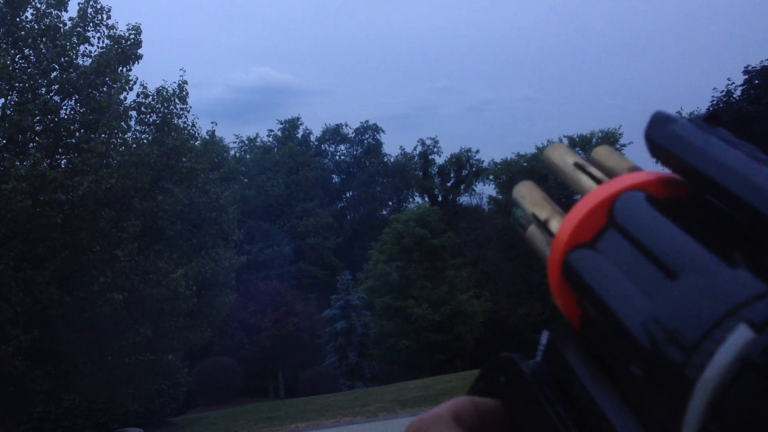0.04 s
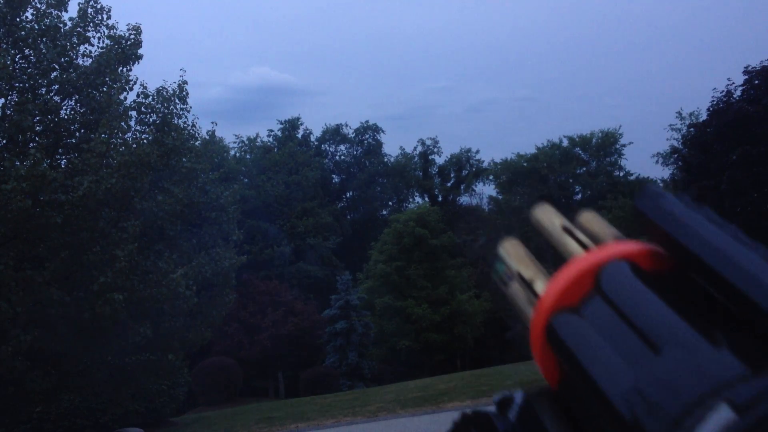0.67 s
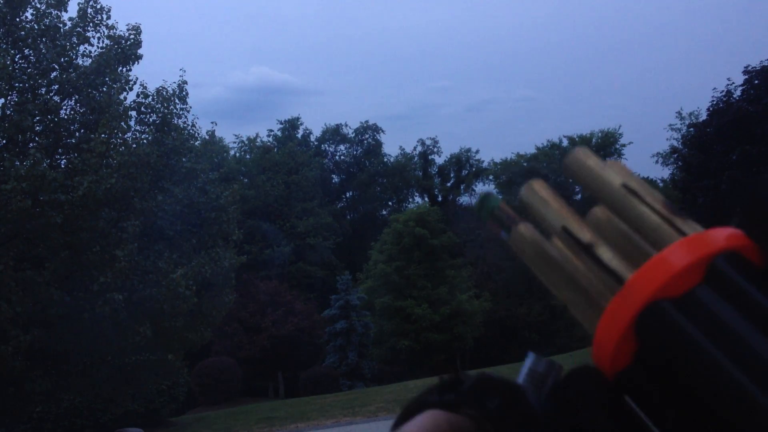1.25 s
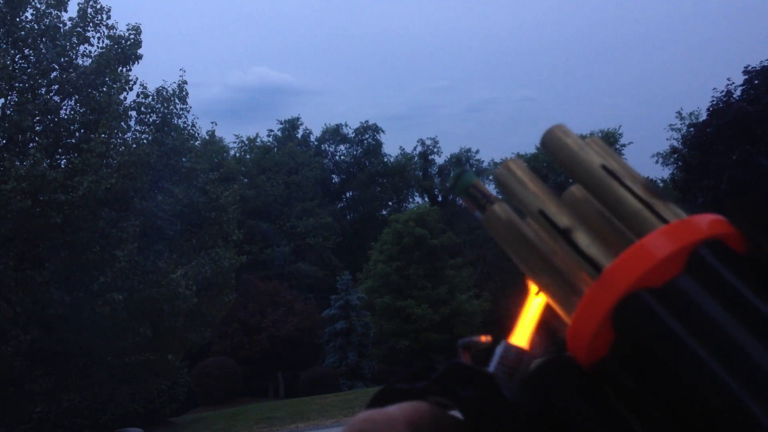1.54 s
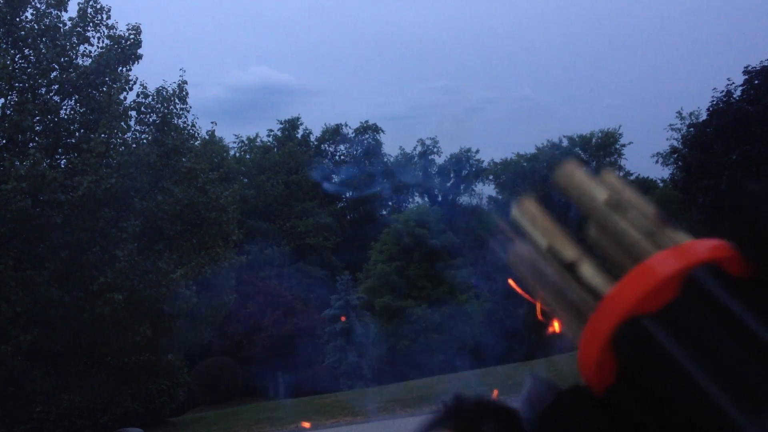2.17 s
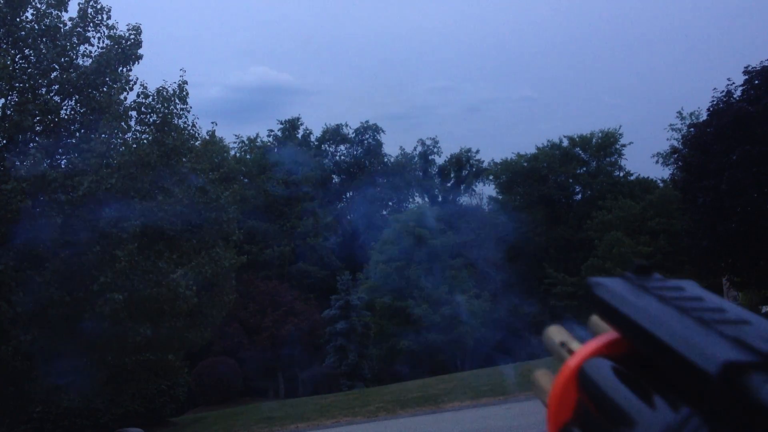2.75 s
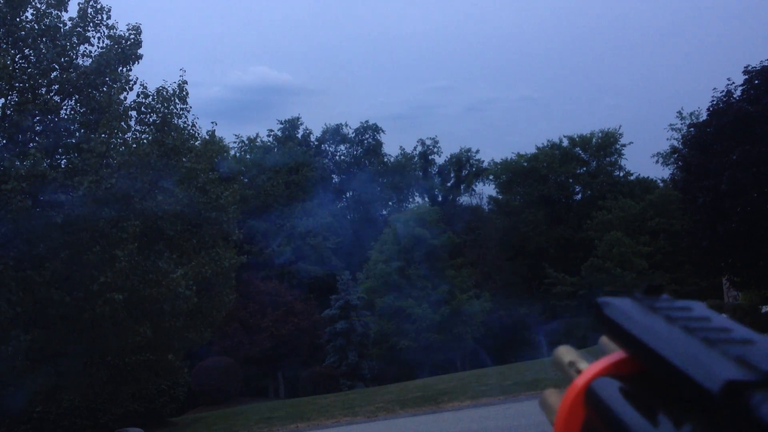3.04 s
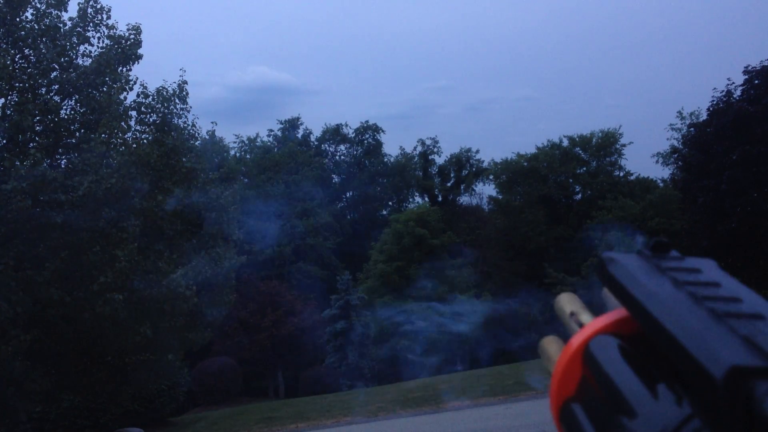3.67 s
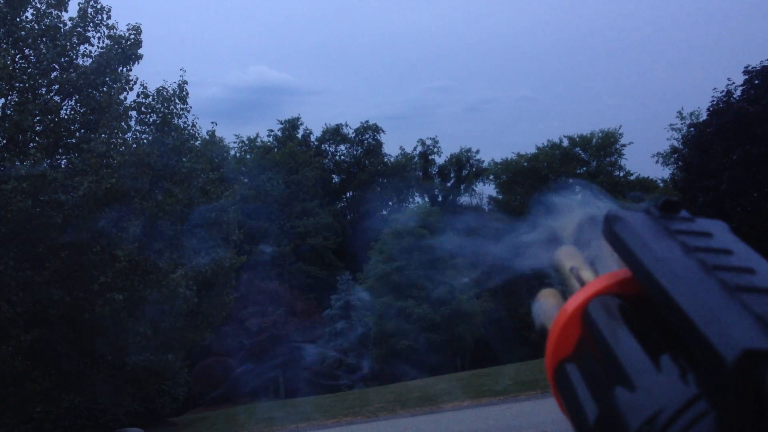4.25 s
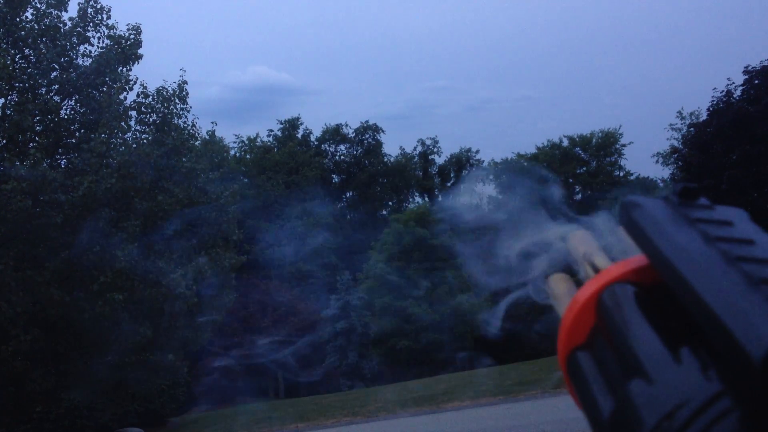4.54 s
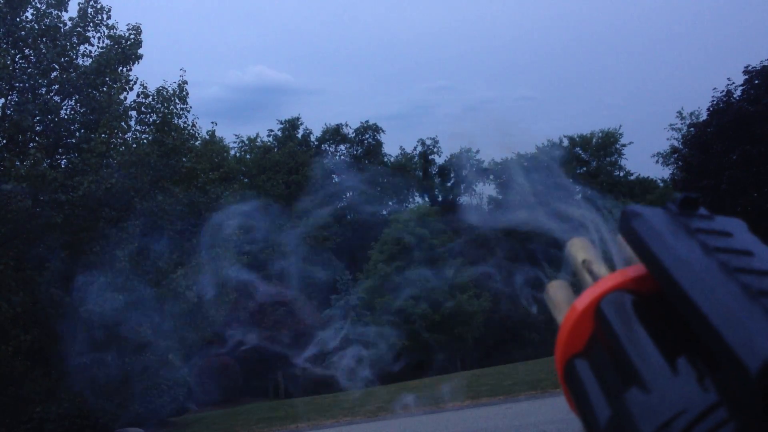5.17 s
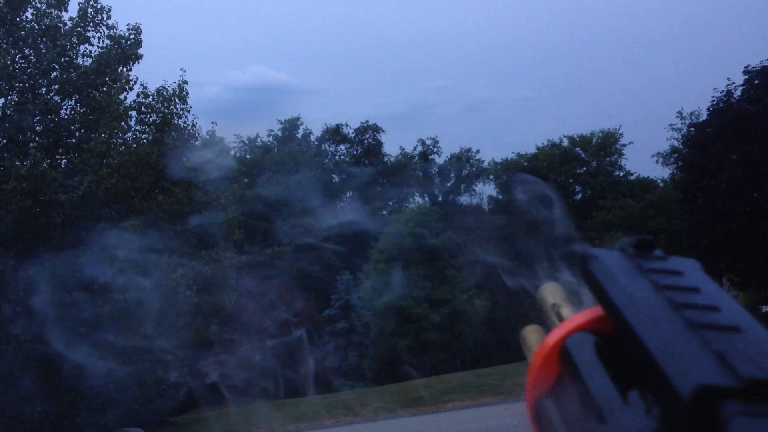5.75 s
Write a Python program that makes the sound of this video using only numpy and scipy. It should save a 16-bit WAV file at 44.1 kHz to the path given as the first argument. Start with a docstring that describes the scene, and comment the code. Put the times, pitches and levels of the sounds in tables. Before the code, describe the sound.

Sharp lighter clicks and a quiet fuse hiss outdoors, followed by a rocket rushing out of a pipe with a piercing whistle.

```python
"""Lighting a whistling bottle rocket

In a quiet yard a torch lighter clicks and hisses twice, and lights a rocket's fuse in a pipe barrel.
The launcher ticks as it is handled, the fuse fizzes into the pipe, and an engine speeds up far away.
The motor catches with a rush, and its burn starts to vibrate in a shrill whistle.
Out of the barrel the whistle turns rough, and falls in pitch as the rocket speeds away."""
import sys
import numpy as np
from scipy import signal
from scipy.fft import rfft, irfft
from scipy.io import wavfile
from scipy.ndimage import uniform_filter1d

SR = 44100
rng = np.random.default_rng(int(sys.argv[2]) if len(sys.argv) > 2 else 0)


def int16_out(signal):
    """Quantize to a 16-bit WAV file."""
    q = np.round(np.clip(np.atleast_2d(signal).T, -1, 1) * 32767)
    wavfile.write(sys.argv[1], SR, q.astype(np.int16))


N = 264906
T, HZ = np.arange(N) / SR, np.fft.rfftfreq(N, 1 / SR)

# tone colour of the evening air (frequency [Hz], level [dB])
AIR_COLOUR = [(18, -67), (30, -39), (79, -42), (108, -6.5), (350, -7.5), (532, -8), (575, -14.5),
              (1260, -16.5), (2070, -21.5), (4310, -21), (5040, -31), (6720, -27), (8500, -27),
              (11300, -28), (15500, -37)]
# faint hum and whine of a camera (pitch [Hz], level [dB])
HUM_TONES = [(1293, -73), (11120, -77.5)]
# how the plastic housing rings (pitch [Hz], width [Hz], level [dB])
HOUSING_RINGS = [(806, 100, -17), (1013, 55, 10.5), (1180, 69, 0), (1515, 220, 7.5), (2100, 65, 11.5),
                 (2860, 34, 6.5), (3450, 170, 0), (4430, 100, 3.5)]
# the lighter's trigger, pressed and let go twice
# (time [s], level [dB], body [dB], bite [dB], treble [dB], ring pitch [Hz])
TRIGGER_SNAPS = [(0.703, -10, -4.5, 2.5, 0, 3530), (1.0916, -15.5, -2, -4.5, 0.5, 8000),
                 (1.593, -11.5, -8, -1, -1.5, 1860), (2.2046, -24.5, -2, 2.5, -2, 2110)]
# small catches of the launcher, the last two perhaps sparks (time [s], level [dB], ring pitch [Hz])
LAUNCHER_TICKS = [(0.2918, -35, 10800), (0.986, -44, 4300), (1.025, -41.5, 7170), (1.2283, -28.5, 11800),
                  (1.4232, -25.5, 11700), (1.4425, -37, 7840), (1.5495, -26, 10600), (2.1377, -39.5, 3600),
                  (2.201, -35, 8200), (2.3684, -29.5, 11400), (2.3799, -35, 6700), (2.4541, -32.5, 11900),
                  (2.5176, -38.5, 7360), (2.548, -33.5, 12500), (2.5518, -38.5, 6840), (4.867, -51, 7600),
                  (5.278, -51, 8000)]
# smaller catches tick higher and thinner; rows are body, bite and treble
# (level at the middle pitch [dB], slope [dB per octave])
TICK_COLOUR = [(-8, -6), (0.5, -6), (0, 9.5)]
# dull knocks of the grip (time [s], level [dB])
GRIP_KNOCKS = [(1.053, -46), (1.2524, -44), (1.535, -46), (1.548, -38), (2.1657, -42.5), (4.8758, -53)]
# the lighter's gas jet (start [s], end [s], level [dB], centre [Hz], width [Hz])
GAS_JETS = [(.44, 1.15, -57.5, 11000, 1160), (1.42, 1.605, -77, 12400, 1500),
            (1.6, 2.23, -57.5, 12500, 1920)]
# the fuse in the open, then deep in the pipe (frequency [Hz], level [dB])
FUSE_IN_OPEN = [(40, -60), (300, -8), (1500, -5.5), (2400, 8), (3200, -19), (4200, 4), (5600, -7.5),
                (7000, 0), (8100, 6.5), (9600, -3), (11500, -6), (13300, -8), (14800, -3.5)]
FUSE_IN_PIPE = [(40, -70), (300, -1.5), (1700, -16.5), (2300, -3), (2650, 6), (3300, -6.5), (4100, -4),
                (5500, -18), (7500, -16.5), (10000, -42), (12500, -13), (15000, -41)]
# the powder flares up (time [s], extra level [dB], half length [s])
FUSE_FLARES = [(1.98, 9.5, 0.08), (2.803, 4.5, .04), (3.237, 11, 0.053), (3.575, 8.5, 0.12), (4.3, 4, 0.32),
               (5.518, 4.5, 0.036)]
# the exhaust in the pipe, in flight, and as gusts on the microphone (frequency [Hz], level [dB])
RUSH_IN_PIPE = [(100, -19), (600, -10.5), (1700, -7.5), (2600, 2), (3500, 4), (4500, 6), (5600, -3.5),
                (8000, 0.5), (9300, -10.5), (12000, -12), (15000, -22)]
RUSH_IN_FLIGHT = [(100, -6), (600, 1), (1500, 1.5), (2200, 7), (3000, -1.5), (4500, 12), (5600, -6.5),
                  (8000, 0.5), (9300, -18), (12000, -4), (15000, -4)]
GUST_COLOUR = [(20, 9), (60, -5.5), (110, -11.5), (200, 2), (320, -1), (450, -11.5), (900, -13),
               (2500, -70)]
# uneven burning, strong before the whistle locks in and at the pipe's mouth (time [s], roughness [0-1])
BURN_ROUGHNESS = [(5.745, 1), (5.805, .7), (5.809, .06), (5.864, .1), (5.872, .68), (5.89, .45),
                  (5.896, .08), (5.912, .1), (5.92, .38)]
# the whistle inside the pipe (time [s], pitch [Hz])
PIPE_PITCH = [(5.745, 2715), (5.761, 3150), (5.783, 3479), (5.825, 4022), (5.833, 4010), (5.841, 3780),
              (5.861, 3650), (5.868, 3750)]
# the whistle's extra tones (pitch multiple [ratio], level in the pipe [dB], level in flight [dB])
EXTRA_TONES = [(.5, -58, -14.5), (1.5, -62, -14), (2, -5, -9.5), (2.5, -58, -14), (3, -15.5, -12),
               (3.5, -60, -21), (4, -19, -3)]
# the yard's echo (frequency [Hz], time to fade by 60 dB [s])
YARD_FADE = [(300, 0.3), (1500, 0.16), (4000, 0.22), (9000, 0.17), (15000, 0.16)]
# two dips in the treble that slightly hollow the whole sound (frequency [Hz], width [Hz], level [dB])
TREBLE_DIPS = [(5010, 160, -6), (9690, 1400, -7)]

# the motor lights, builds pressure, locks into its whistle, blasts the microphone and leaves the pipe
IGNITION_S, BUILD_S, LOCK_S, BLAST_S, EXIT_S = 5.684, 5.745, 5.808, 5.84, 5.870
SOUND_M_PER_S = 343


def amp(db):
    """Turns decibels into a gain."""
    return 10 ** (np.asarray(db) / 20)


def evened(x):
    """Scales a signal to an average power of 1."""
    return x / np.sqrt(np.mean(abs(x) ** 2) + 1e-20)


def read(points, hz=HZ):
    """Looks up a table's value at hz, on a log-frequency scale."""
    f, value = np.transpose(points)
    return np.interp(np.log(hz + 1), np.log(f + 1), value)


def curve(points):
    """Joins a time table's points with straight lines."""
    return np.interp(T, *np.transpose(points))


def ramp(start_s, length_s):
    """Rises evenly from 0 to 1."""
    return np.clip((T - start_s) / length_s, 0, 1)


def blend(a, b, share):
    """Goes from a to b as share goes from 0 to 1."""
    return a + share * (b - a)


def swell(top_s, half_length_s):
    """A smooth hump of height 1."""
    return np.exp(-((T - top_s) / half_length_s) ** 2)


def peak(hz, centre_hz, width_hz):
    """How strongly a ringing part answers each frequency; 1 at its centre."""
    return 1 / (1 + 2j * (hz - centre_hz) / width_hz)


def add(mix, s, sound):
    """Lays a sound into the mix at s seconds."""
    part = mix[round(s * SR):][:len(sound)]
    part += sound[:len(part)]


def noise(colour_db):
    """Noise of power 1, shaped by a level for each frequency."""
    return evened(irfft(rfft(rng.standard_normal(N)) * amp(colour_db), N))


def narrow_noise(centre_hz, width_hz):
    """Noise packed closely around one pitch."""
    return noise(20 * np.log10(abs(peak(HZ, centre_hz, 2 * width_hz)) ** 2))


def wander(rate_hz):
    """A random wobble of power 1, mostly slower than rate_hz."""
    return noise(-20 * np.log10(1 + (HZ / rate_hz) ** 2))


def evening_air(level_db=-57):
    """A soft background hush that wavers a little."""
    return amp(level_db + .5 * wander(3.9)) * noise(read(AIR_COLOUR))


def camera_hum():
    """Two faint, unsteady tones come from inside a camera."""
    return sum(amp(db) * narrow_noise(hz, width_hz=25) for hz, db in HUM_TONES)


def click(level_db, body_db, bite_db, treble_db, fade_s, ring_hz, ring_db=0):
    """A catch snaps: a very short rattle rings the struck part and the housing."""
    t = np.arange(4096) / SR
    hz = np.fft.rfftfreq(len(t), 1 / SR)
    rise_s = .00017 * (fade_s / .016) ** 2  # long, scraping knocks start more softly
    attack = 1 - np.exp(-t / rise_s)
    rattle = rfft(rng.standard_normal(len(t)) * attack * amp(-60 * t / (.76 * fade_s)))
    rattle /= np.sqrt(uniform_filter1d(abs(rattle) ** 2, size=70))  # flat, so the parts set the colour
    housing = sum(amp(db) * peak(hz, f, width) for f, width, db in HOUSING_RINGS)
    rings = 1 + housing + amp(ring_db) * peak(hz, ring_hz, width_hz=1000)
    body = [(20, -70), (150, body_db - 20), (450, body_db - 26.5), (780, body_db - 2),
            (2200, body_db - 3.5)]
    bite = [(3000, bite_db - 3.5), (4500, bite_db - 1.5)]
    treble = [(5800, -2.5), (9000, 5), (11500, treble_db), (15000, treble_db - 5.5)]
    snap = irfft(rattle * rings * amp(read(body + bite + treble, hz))) * (t < t[-1] / 2)
    strength = np.sqrt(np.sum(snap ** 2) / (.002 * SR))  # as if packed into 2 ms
    return amp(level_db) * snap / strength


def handling(middle_hz=7500):
    """The trigger snaps, the launcher ticks and the grip knocks; such small parts give no bass."""
    out = np.zeros(N)
    for s, db, body_db, bite_db, treble_db, hz in TRIGGER_SNAPS:
        add(out, s, click(db, body_db, bite_db, treble_db, fade_s=.022, ring_hz=hz))
    for s, db, hz in LAUNCHER_TICKS:
        colour = [middle_db + slope * np.log2(hz / middle_hz) for middle_db, slope in TICK_COLOUR]
        add(out, s, click(db, *colour, fade_s=.014, ring_hz=hz, ring_db=4))
    for s, db in GRIP_KNOCKS:
        add(out, s, click(db, body_db=12.5, bite_db=14.5, treble_db=-5, fade_s=.042, ring_hz=2230))
    return signal.sosfilt(signal.butter(2, 250, "high", fs=SR, output="sos"), out)


def lighter_gas(valve_s=.04):
    """Gas hisses out of the lighter's nozzle while the button is held."""
    out = np.zeros(N)
    lower_band = amp(-9) * np.exp(-((HZ - 8500) / 1800) ** 2)
    for start, end, db, hz, width in GAS_JETS:
        main_band = np.exp(-((HZ - hz) / width) ** 2 / 4)
        valve = np.clip(np.minimum(T - start, end - T) / valve_s, 0, 1)
        out += amp(db) * valve * noise(20 * np.log10(main_band + lower_band + 1e-6))
    return out


def fuse(base_db=-67, sputter_db=2.36, sparks_per_s=120, spark_s=.0016):
    """Powder fizzes and spits sparks; the pipe rings along more as the flame creeps inside."""
    lit = ramp(start_s=1.7, length_s=.24)
    depth = .93 * ramp(start_s=2.78, length_s=2.55) ** 2
    pipe_db = 10 * depth ** 2
    flare_db = sum(db * swell(s, half_length) for s, db, half_length in FUSE_FLARES)
    fizz = np.sqrt(1 - depth) * noise(read(FUSE_IN_OPEN)) + np.sqrt(depth) * noise(read(FUSE_IN_PIPE))
    # a thin sizzle swells once while the flame is in the open
    sizzle = amp(-14.5 + 15 * swell(top_s=2.6, half_length_s=.89)) * narrow_noise(4480, width_hz=280)
    spits = (rng.random(N) < sparks_per_s / SR) * np.minimum(rng.exponential(1, N), 2)
    sparks = .76 * signal.lfilter([1], [1, -np.exp(-1 / (spark_s * SR))], spits)  # each spit dies away
    level_db = base_db + pipe_db + flare_db + sputter_db * wander(33)
    return lit * amp(level_db) * ((1 + sparks) * fizz + sizzle)


def far_engine(level_db=-61, steady_hz=165, throttle_s=4.92, climb_hz_per_s=61):
    """Only the firing tone of a far engine carries, climbing as it speeds up."""
    hz = steady_hz + climb_hz_per_s * np.maximum(T - throttle_s, 0) + 2 * wander(12)
    tone = np.sqrt(2) * np.sin(2 * np.pi * np.cumsum(hz) / SR)
    return amp(level_db + 2 * wander(6)) * ramp(start_s=4.6, length_s=.8) * tone


def pressure():
    """Builds from 0 to 1 in the motor, until the whistle locks in."""
    return ramp(BUILD_S, LOCK_S - BUILD_S)


def in_flight():
    """0 while the rocket is in the pipe, 1 once it is out."""
    return np.clip((T - EXIT_S) / .0042 + .5, 0, 1)


def rocket_speed(top_m_per_s=70, speed_up_s=.12):
    """Out of the pipe, thrust speeds the rocket up until air drag balances it."""
    return top_m_per_s * (1 - np.exp(-np.maximum(T - EXIT_S, 0) / speed_up_s))


def exhaust(lit_db=-41.5, built_db=-23.5, locked_db=-31, open_db=-25, gust_db=-26):
    """The motor's jet rushes in the pipe, brightens in the open and blows gusts at the microphone."""
    rough, flying = curve(BURN_ROUGHNESS), in_flight()
    distance_m = np.cumsum(rocket_speed()) / SR
    away_db = -13 * (distance_m / 4.2) ** 2
    # the rush grows with the pressure, then drops once the whistle locks in
    building_db = blend(lit_db, built_db, np.sqrt(pressure()))
    pipe_db = blend(building_db, locked_db, ramp(LOCK_S, .019))
    rush_db = blend(pipe_db, open_db + 10.5 * rough + away_db, flying)
    jet = np.sqrt(1 - flying) * noise(read(RUSH_IN_PIPE)) + np.sqrt(flying) * noise(read(RUSH_IN_FLIGHT))
    rush = amp(rush_db + wander(130)) * jet
    gusts = amp(gust_db + 12 * rough + away_db) * noise(read(GUST_COLOUR))
    return ramp(IGNITION_S, .005) * rush + ramp(BLAST_S, .005) * gusts


def fuzzy_tone(phase, fuzz, width_hz=130):
    """One tone of the whistle: steady at fuzz 0, all swirling gas from fuzz 1 up."""
    fuzz = np.clip(fuzz, 0, 1)
    swirl = evened(wander(width_hz) + 1j * wander(width_hz))
    strength = np.sqrt(1 - fuzz ** 2) + fuzz * swirl
    return np.sqrt(2) * (strength * np.exp(1j * phase)).imag


def whistle(flight_hz=4570, jitter=.031):
    """The burn vibrates in the rocket's tube; in flight its period doubles, adding in-between tones."""
    rough, flying = curve(BURN_ROUGHNESS), in_flight()
    # the pitch jumps too far at the pipe's mouth, settles, and falls as the rocket speeds away
    overshoot_hz = 230 * np.exp(-np.maximum(T - EXIT_S, 0) / .009)
    receding_hz = (flight_hz + overshoot_hz) / (1 + rocket_speed() / SOUND_M_PER_S)
    hz = blend(curve(PIPE_PITCH), receding_hz, flying)
    phase = 2 * np.pi * np.cumsum(hz * (1 + jitter * rough * wander(238))) / SR
    # it grows out of the rush, then jumps to full strength; rough burning weakens it
    growing_db = -38 + 21 * np.sqrt(pressure())
    locked_db = -7 - 7 * rough - 1.9 * (1 - flying)
    level_db = blend(growing_db, locked_db, ramp(LOCK_S - .002, .003))
    # the extra tones come up after the lock; in flight they follow the roughness
    pipe_bright_db = blend(-17, 1.5, ramp(LOCK_S, .019))
    bright_db = blend(pipe_bright_db, -7.5 + 14 * rough, flying)
    extras = np.zeros(N)
    for multiple, pipe_db, flight_db in EXTRA_TONES:
        gain = amp(bright_db + blend(pipe_db, flight_db, flying))
        extras += gain * fuzzy_tone(multiple * phase, fuzz=1.7 * rough + .14 * multiple)
    main_tone = fuzzy_tone(phase, fuzz=amp(3) * rough)
    return ramp(BUILD_S, .006) * amp(level_db) * (main_tone + extras)


def yard_echo(sound):
    """Ground, launcher and trees scatter the sound into a short tail."""
    t = np.arange(SR // 2) / SR
    bounces = rng.standard_normal(len(t)) * (rng.random(len(t)) < .1) * (t > .004)
    hz, s, bands = signal.stft(bounces, SR, nperseg=256)
    fade = amp(-60 * s / read(YARD_FADE, hz)[:, None])
    _, tail = signal.istft(bands * fade, SR, nperseg=256)
    return signal.fftconvolve(sound, tail / np.linalg.norm(tail))[:N]


def scene(echo_db=-16.5):
    """Mixes the loud sounds and their echo with the quiet ones, in one channel."""
    loud = handling() + exhaust() + whistle()
    air = evening_air()
    echo = amp(echo_db) * yard_echo(loud)
    return (loud + echo + air + lighter_gas() + fuse() + far_engine() + camera_hum())[None]


def record(dry, ceiling=.7, bottom_hz=45, top_hz=15350):
    """Cuts two dips in the treble, rounds off loud peaks and removes the lowest and highest tones."""
    hz = np.linspace(0, SR / 2, 1025)
    dips_db = sum(db * np.exp(-((hz - f) / width) ** 2) for f, width, db in TREBLE_DIPS)
    # squared, because minimum_phase takes the square root of the gain
    dip_filter = signal.minimum_phase(signal.firwin2(511, hz, amp(dips_db) ** 2, fs=SR))
    x = signal.lfilter(dip_filter, 1, dry)
    x = signal.resample_poly(x, 4, 1, axis=1)  # finer steps keep the rounding clean
    x = x / (1 + (x / ceiling) ** 8) ** (1 / 8)
    x = signal.resample_poly(x, 1, 4, axis=1)
    x = signal.sosfilt(signal.butter(2, bottom_hz, "high", fs=SR, output="sos"), x)
    treble_cut = signal.firwin(401, top_hz, window=("kaiser", 8), fs=SR)
    return signal.oaconvolve(x, treble_cut[None], "same")


dry = scene()
out = record(dry)
int16_out(out)
```